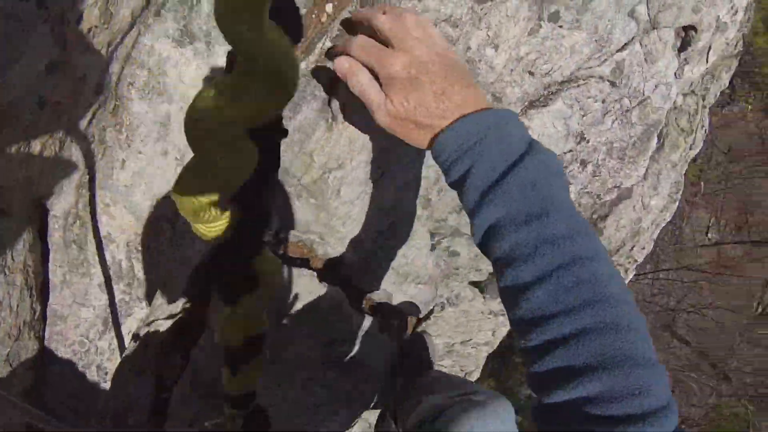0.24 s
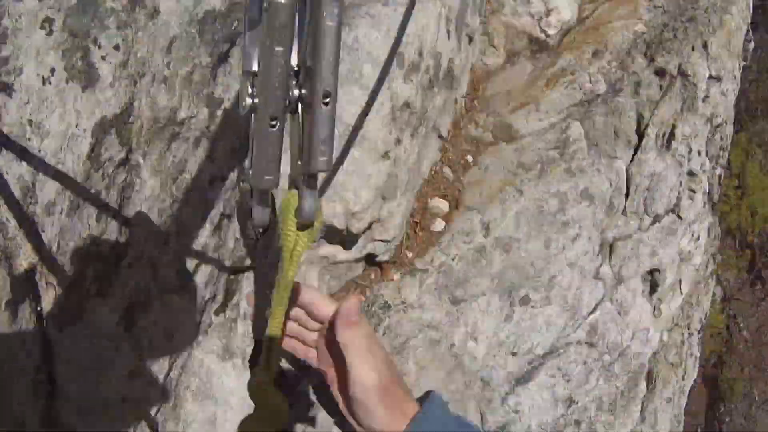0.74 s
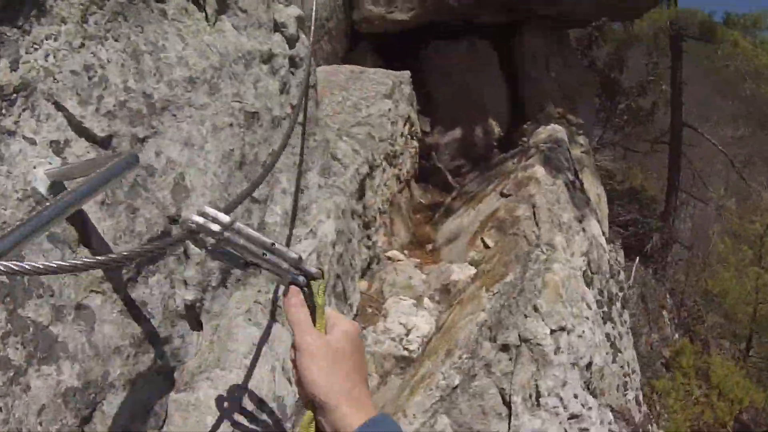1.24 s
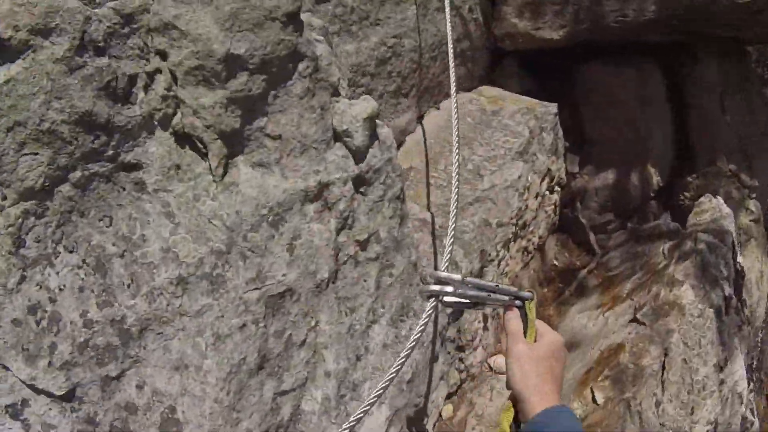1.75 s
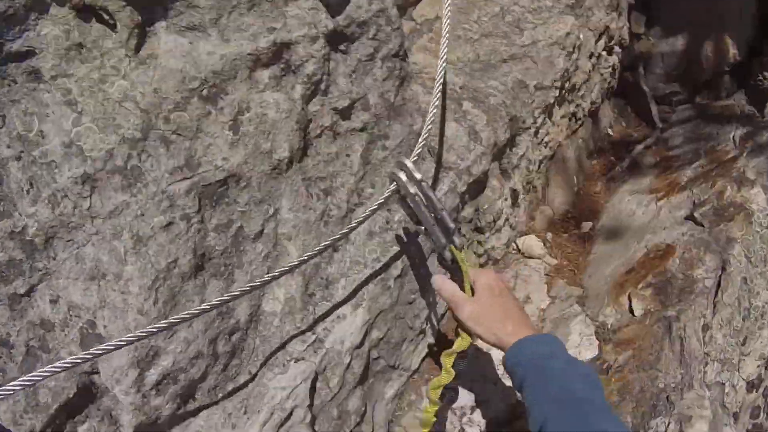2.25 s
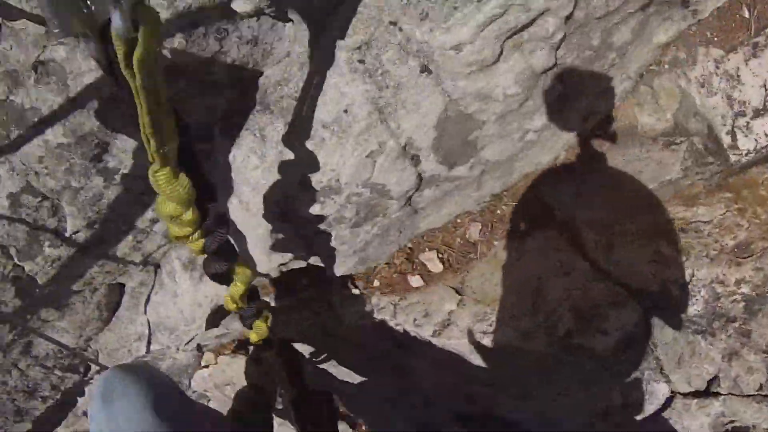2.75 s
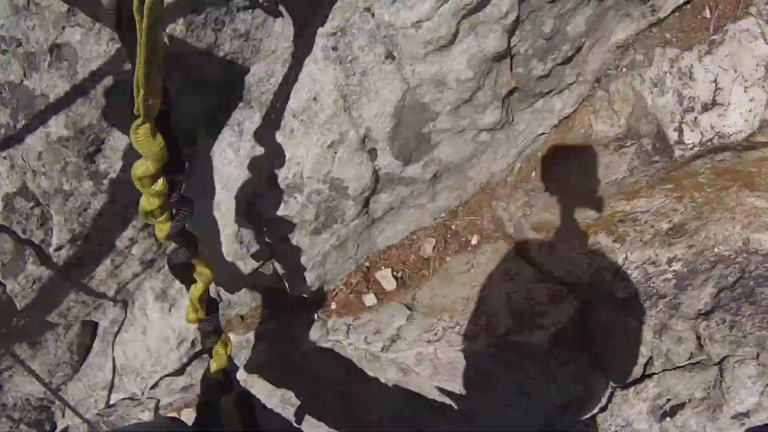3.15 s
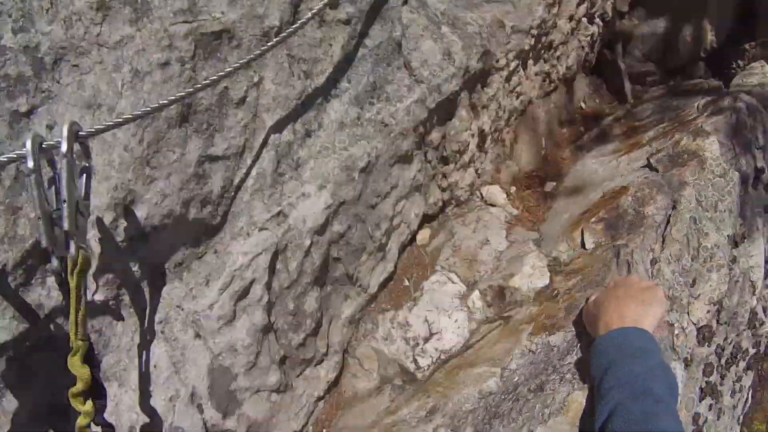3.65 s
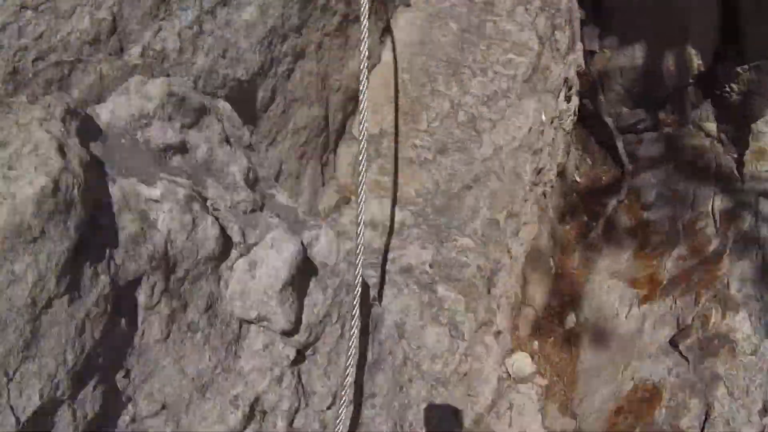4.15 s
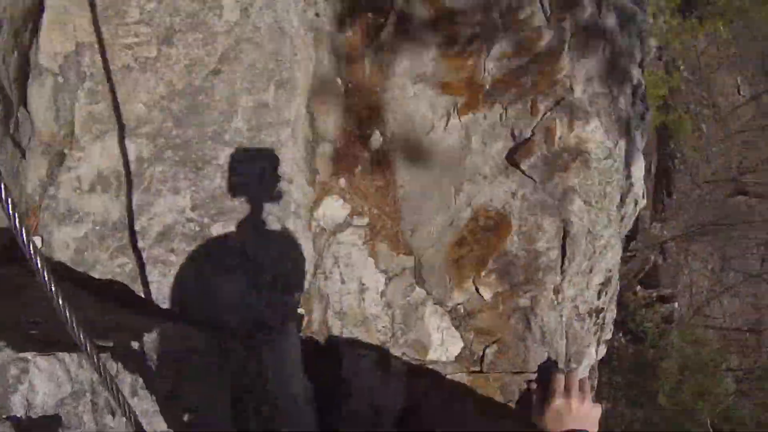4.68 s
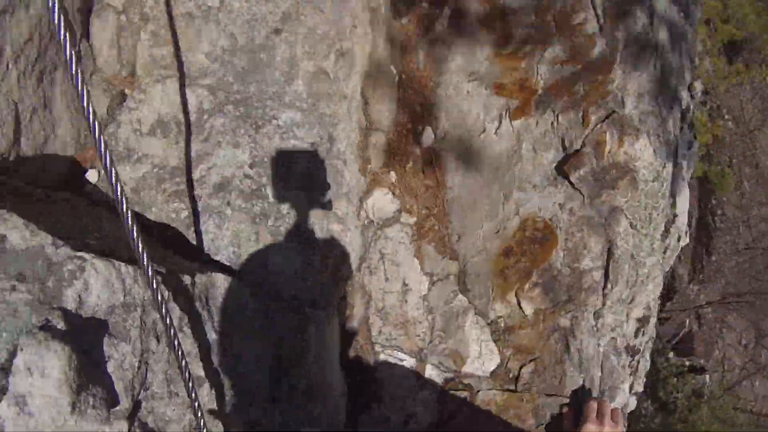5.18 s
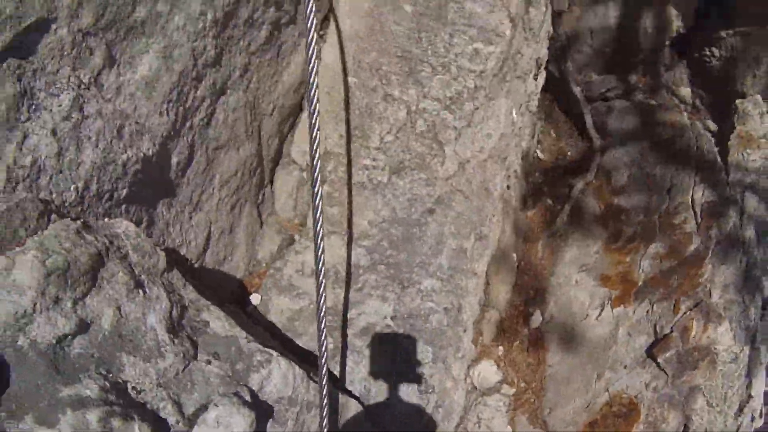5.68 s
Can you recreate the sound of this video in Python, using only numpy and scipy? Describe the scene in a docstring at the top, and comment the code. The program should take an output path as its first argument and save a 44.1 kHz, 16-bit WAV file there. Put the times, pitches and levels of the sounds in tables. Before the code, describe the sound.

A dry, close, muffled perspective from inside a helmet-mounted camera housing, with unsteady deep rumble, soft strap rustle and faint air noise throughout. At 0 s a hard rattling knock, strap scuff and short steel ring come together, then only weak bumps and, from 0.6 s, tiny carabiner clicks. From 0.9 to 1.3 s heavy low jolts and dull knocks pile up. Thin, bright scratching of carabiners on cable strands follows until about 2 s, interrupted by strong thumps at 2.1-2.2 s and lighter knocks to 2.45 s; sharper scrapes and clicks reach 2.7 s. A quieter gap follows, with a clear high metallic ring at 3.35 s. From 3.65 s a strap drags gritty with a faint falling creak, into the loudest thuds at 3.8-4.1 s. A thump at 4.5 s and hollow knocks with short rings at 4.9, 5.15, 5.35 and 5.6 s end it over rumble.

```python
"""A climber moves two carabiners along a steel cable, heard inside a closed housing on the helmet.
Strap scuff, knocks and a ringing rung at once; weak jolts from 0.16 s, strong ones from 0.9 s; strands scratch
the carabiners at 1.2-2.7 s, more blows fall near 2.2 s; a clear ring at 3.4 s, then a strap drags and creaks
into heavy jolts at 3.8-4.1 s; knocks and rings to the end. Rumble, boom, rustle and air noise lie under all.
Noise bursts and clicks drive resonant modes; jolts and rings are decaying sines."""
import sys
import numpy as np
from scipy import signal
from scipy.fft import rfft, irfft
from scipy.io import wavfile

SR = 44100
rng = np.random.default_rng(int(sys.argv[2]) if len(sys.argv) > 2 else 0)


def pcm_store(signal):
    """Save signal as 16-bit PCM."""
    levels = np.round(np.clip(np.atleast_2d(signal), -1, 1) * 32767)
    wavfile.write(sys.argv[1], SR, levels.astype(np.int16).T)


N = 261072

# air noise spectrum: (frequency [Hz], relative density [dB per Hz])
AIR = [(200, -1), (500, -11), (1000, -10), (2000, -12), (4000, -17.5), (8000, -24), (12000, -33.5),
       (15000, -54)]
# hiss opposite in the two channels: (frequency [Hz], relative density [dB per Hz])
SIDE_HISS = [(700, -31), (1500, -5.5), (2500, 0.5), (5000, -1), (9000, -6), (12000, -15), (15000, -40)]
# body movement through the mount: (time [s], mean deep rumble [dB], mean strap rustle [dB])
MOVE = [(0.0, -25, -52), (0.08, -28, -62), (0.4, -28, -62), (0.58, -31, -65), (0.69, -20, -52),
        (0.81, -31, -60), (1.04, -33, -54), (1.12, -25, -45), (1.4, -21, -57), (1.65, -18, -55),
        (1.73, -27, -62), (1.85, -31, -64), (1.96, -30, -59), (2.01, -29, -50), (2.07, -26, -60),
        (2.2, -20, -64), (2.37, -30, -59), (2.47, -27, -60), (2.57, -23, -56), (2.85, -29.5, -66),
        (3.4, -32, -63), (3.7, -22, -56), (3.9, -15, -39), (4.06, -29, -68), (4.28, -22, -53),
        (4.4, -26, -61), (4.52, -21, -50), (4.75, -24, -59), (4.96, -28, -63), (5.09, -21, -56),
        (5.2, -24, -52), (5.35, -27, -61), (5.6, -30, -62), (5.92, -20, -51)]
# strap rustle spectrum: (frequency [Hz], relative density [dB per Hz])
RUSTLE = [(250, 1), (400, 3.5), (700, -12), (950, 0), (1300, -12), (2200, -14.5), (3500, -19),
          (6000, -27.5)]
# housing modes: (frequency [Hz], width [Hz], relative level [dB])
HOUSING = [(667, 233, 1), (905, 143, -2), (1380, 242, 3), (1637, 250, 1), (2160, 157, -2),
           (2657, 460, -3.5), (3134, 185, -9)]
# treble modes of the housing: (frequency [Hz], width [Hz], relative level [dB])
HOUSING_TREBLE = [(3660, 1000, 9), (4840, 1200, 15), (5370, 1200, 13.5), (7300, 2700, 3), (9800, 2500, -9)]
# low modes shaken by every blow: (frequency [Hz], width [Hz], level re body for a 1 kHz blow [dB])
THUD = [(172, 45, -25), (440, 220, -19)]
# strap drags on the housing: (start [s], loudest [s], end [s], relative level at each of the three [dB] x3)
SCUFFS = [(0.0, 0.01, 0.022, -42, -42, -32), (3.62, 3.8, 4.02, -77, -43, -53),
          (4.85, 4.88, 4.905, -66, -48, -44)]
# jolts: (time [s], peak before ducking [dB], pitch [Hz], swings to fall 60 dB [count], push +1 / pull -1)
JOLTS = [(.16,-30,170,9.5,1),(.26,-32,170,7.5,-1),(0.527,-30.5,153,3.5,1),(.905,-15.5,62,2.1,-1),(.942,-5,61,4.9,1),(.961,-16.5,153,14.5,1),(1.062,-5,94,1.3,1),(1.07,0.5,127.6,10.8,-1),(1.092,-1.5,62,5.6,1),(1.113,-17,140,9.5,1),(1.145,-1,130,8.1,-1),(1.193,-8,157,15,1),(1.231,-5,53.6,4.6,-1),(1.288,-11,43,5.6,-1),(1.417,-14,57,3.1,1),(1.563,-24,150,9.3,1),(1.633,-24,165,8.1,1),(2.123,-16.5,165,30,1),(2.167,2.5,94,4.6,1),(2.192,-3.5,130,9.5,-1),(2.205,1,70.5,6.4,-1),(2.606,-20,43.4,6.9,1),(2.771,-21.5,40,3.7,1),(3.585,-25,165,12,1),(3.834,4.5,62,3.1,1),(3.894,4,156,9.4,-1),(3.968,-10.5,134.5,43,-1),(4.034,-4.5,59.6,1.3,1),(4.046,4,161.5,9.4,1),(4.053,8,83.6,3.3,-1),(4.16,-26,170,9.5,1),(4.283,-13.5,61,2.9,-1),(4.516,-18,90,2,-1),(4.522,-3.5,160,9,1),(4.523,-12,380,4,1),(4.545,-24,140,5,1)]
# modes of the steel rung: (frequency [Hz], relative level [dB], usual time to fall 60 dB [s])
RUNG = [(710, -10, .3), (1034, -10, .37), (1448, 0, .42), (1534, -2, .62), (2441, -24, .55), (2826, -9, .4),
        (3052, -8, .28), (3693, -22, .55), (3951, -5, .16), (4705, -17, .15), (4813, -16, .12),
        (5420, -4, .09), (5700, -17, .14)]
# blows on the rung: (time [s], level [dB], favoured pitch [Hz], fall-off from it [dB/octave],
# ring time [share of usual])
RINGS = [(.026,-32.5,1700,3.5,.9),(1.312,-47.5,1450,12,.6),(2.277,-39,710,18,1.1),(2.344,-50,1450,14,.9),(2.437,-59,1900,12,.9),
         (3.353,-27,2435,140,1.1),(3.36,-58,1500,4,.9),(3.896,-37.5,3820,5,.9),(4.046,-46,1450,4.5,.9),(4.092,-45,1440,80,4.5),(4.29,-50,1540,40,.4),
         (4.918,-44,1400,12,1.1),(4.925,-42,3052,90,.9),(5.142,-41,1550,8,1.3),(5.143,-34,3052,40,.6),(5.144,-36,3690,90,1.1),(5.347,-47,1440,9,1.1),(5.349,-40,2441,90,.7),(5.35,-52,3850,50,1.1),(5.574,-56.5,3900,20,.7)]
# carabiner modes: (frequency [Hz], nominal width [Hz], relative level in strokes [dB])
CARABINER = [(2850, 60, -9), (3730, 80, -13), (4310, 90, -1), (4760, 130, -5), (5280, 70, -4),
             (5410, 70, -1), (5650, 60, -8), (5850, 130, -2), (6010, 150, -4), (6850, 90, -14),
             (7100, 150, -14), (7340, 70, -11), (8050, 200, -14), (8920, 90, -8), (10500, 70, -23),
             (11500, 110, -25)]
# strokes along the cable: (start [s], loudest [s], end [s], relative level at each of the three [dB] x3,
# favoured pitch [Hz])
SLIDES = [(1.17, 1.33, 1.6, -67, -56.5, -66, 5700), (1.6, 1.65, 1.82, -67, -64, -68, 5400),
          (1.9, 2.008, 2.04, -76, -65, -72, 4300), (2.37, 2.44, 2.5, -68, -54, -58, 7500),
          (2.5, 2.58, 2.6, -58, -50.5, -55, 6400), (2.6, 2.67, 2.71, -56, -48, -56, 4800)]
# carabiners touching: (time [s], click level [dB], loudest pitch [Hz], held in contact 1 / hanging free 0)
TICKS = [(0.608,-60,5300,0),(.668,-61,6900,0),(0.687,-53,4900,0),(0.842,-48,5260,0),
         (1.169,-49,5900,1),(1.18,-44,6850,1),(1.182,-52,4300,1),(1.706,-58,7900,1),(1.735,-59,7900,1),(1.8,-58,7700,1),(1.803,-67,7340,0),(1.93,-54,3800,0),(2.0,-51,3820,0),
         (2.575,-47,5280,0),(2.675,-45,4310,1),(2.676,-54,5260,0),(2.702,-52,7340,0),(2.705,-44,4900,0)]
# knocks: (time [s], body peak before ducking [dB], favoured pitch [Hz], treble peak re body [dB])
KNOCKS = [(0.024, -4.5, 2160, -10.5), (0.037, -11.5, 1300, -28), (0.049, -19, 950, -35),
          (0.91, -32.5, 600, -15), (0.943, -28, 708, -11), (1.06, -7, 619, -29.5), (1.073, -14, 1200, -25),
          (1.093, -22.5, 628, -32.5), (1.144, -25, 818, -11), (1.199, -26, 649, -33),
          (1.231, -34.5, 1650, -21), (1.285, -36, 700, -30), (1.309, -19, 1640, -26),
          (1.563, -37, 950, -26), (1.644, -34, 630, -27), (1.678, -52, 1400, 0), (2.124, -21, 608, -43),
          (2.166, -19, 650, -16.5), (2.191, -24.5, 600, -38), (2.204, -14, 1350, -20),
          (2.228, -30, 704, -40.5), (2.274, -23.5, 1480, -43), (2.345, -33, 910, -38.5),
          (2.356, -30.5, 880, -31), (2.435, -16.5, 2030, -17), (2.446, -29, 780, -22),
          (2.47, -62, 2100, 15), (2.63, -60, 2100, 16), (2.672, -56, 2100, 22), (3.152, -40, 1065, -26),
          (3.22, -40, 700, -30), (3.232, -29, 1380, -22), (3.352, -17, 2150, -40), (3.357, -21, 900, -40),
          (3.814, -23.5, 786, -29), (3.833, -15, 684, -21.5), (3.887, -16, 670, -32),
          (3.893, -5, 1900, -19.5), (3.903, -22, 1090, -5.5), (3.981, -27.5, 724, -24),
          (4.036, -28, 605, -13), (4.046, -2.5, 594, -25), (4.056, -26, 704, -32), (4.087, -30, 1470, -35),
          (4.159, -38.5, 950, -34), (4.351, -20, 1710, -21), (4.455, -41, 950, -27),
          (4.489, -39, 900, -25.5), (4.521, -12, 600, -35), (4.548, -38, 1500, -12),
          (4.634, -20.5, 1450, -42), (4.73, -39.5, 630, -12.5), (4.895, -27, 2160, -35),
          (4.91, -30, 900, -40), (4.917, -9.5, 1380, -35), (4.924, -14, 2160, -40), (5.069, -37, 950, -32),
          (5.116, -36, 1400, -37), (5.128, -15, 1100, -33), (5.14, -5, 2160, -17),
          (5.177, -11.5, 1000, -30), (5.186, -29, 940, -41), (5.226, -23, 2160, -30),
          (5.235, -23.5, 1480, -37), (5.347, -15, 1420, -32), (5.399, -37, 915, -27),
          (5.572, -19, 1380, -49), (5.614, -35, 1100, -15)]

AIR_DB, SIDE_HISS_DB, CUTOFF_HZ = -62.5, -79, 15700
BOOM_DB, BOOM_DB_PER_DB, USUAL_RUSTLE_DB = -44.5, 1.15, -57   # boom level at the usual rustle
CREAK_S, CREAK_HZ, CREAK_SAG_HZ_PER_S, CREAK_DB = (3.725, 3.78, 3.89), 500, 780, -44.5   # start, peak, end
STROKE_FADE_S = 0.018   # time constant after a stroke or drag ends
BOUNCE_S, DAMPING_S = 0.03, 0.04   # blows within a bounce ring together; time constant of stilling
SLIDE_FOCUS_DB_PER_OCTAVE, TICK_FOCUS_DB_PER_OCTAVE = 16.0, 60
FREE_DAMPING, HELD_DAMPING, STROKE_DAMPING = 0.35, 2.2, 0.8   # share of the nominal carabiner widths
TAPS_PER_S, TAP_MAX_DB = 5, -48
RATTLE_S, RATTLE_S_PER_DB = 0.028, 0.00022   # rattle length at 0 dB, shorter for weaker blows
KNOCK_FOCUS_DB_PER_OCTAVE, THUD_DB_PER_OCTAVE, BODY_CUT_HZ = 8.8, 6.0, 5500


def from_db(db):
    """Decibels to gain."""
    return 10 ** (np.asarray(db, float) / 20)


def rms_one(x):
    """Scale to rms 1."""
    return x / np.sqrt(np.mean(x ** 2) + 1e-20)


def curve(rows, column):
    """One table column interpolated over the first, sample by sample."""
    rows = np.array(rows, float)
    return np.interp(np.arange(N) / SR, rows[:, 0], rows[:, column])


def drift(rate_hz):
    """Slow noise of rms about 1: two equal low-pass poles at rate_hz, run at SR / 40."""
    r = np.exp(-80 * np.pi * rate_hz / SR)
    white = rng.standard_normal(N // 40 + 2002)
    slow = signal.lfilter([1], [1, -2 * r, r * r], white)[2000:]
    return np.interp(np.arange(N) / 40, np.arange(len(slow)), rms_one(slow))


def coloured(x, spectrum):
    """Shape by a spectrum, 12 dB/octave roll-off added below its first point; rms 1."""
    hz, db = np.transpose(spectrum)
    f = np.maximum(np.fft.rfftfreq(N, 1 / SR), 1)
    gain = from_db(np.interp(np.log(f), np.log(hz), db)) * np.minimum(f / hz[0], 1) ** 2
    return rms_one(irfft(rfft(x) * gain, N))


def resonance(x, hz, width_hz):
    """Two-pole resonance; a unit click rings as a decaying sine of starting amplitude about 1."""
    r, w = np.exp(-np.pi * width_hz / SR), 2 * np.pi * hz / SR
    return signal.lfilter([0, np.sin(w)], [1, -2 * r * np.cos(w), r * r], x + 1e-18)


def lowpass(x, order, hz):
    """Butterworth low-pass."""
    return signal.sosfilt(signal.butter(order, hz, fs=SR, output="sos"), x)


def add(out, s, sound):
    """Mix a short sound in at a time."""
    i = round(s * SR)
    out[i:i + len(sound)] += sound[:N - i]


def grains(per_s, spread_db):
    """Random clicks of uneven size and sign."""
    sizes = from_db(spread_db * np.minimum(rng.exponential(1, N), 5)) * rng.choice([-1, 1], N)
    return sizes * (rng.random(N) < per_s / SR)


def gated(strokes):
    """Sum of stroke gains, each through its three levels, then fading exponentially."""
    t = np.arange(N) / SR
    total = 0
    for row in strokes:
        fade = np.exp(-np.maximum(t - row[2], 0) / STROKE_FADE_S)
        total = total + from_db(np.interp(t, row[:3], row[3:])) * (t >= row[0]) * fade
    return total


def air():
    """Broadband noise with a slightly wavering level."""
    level_db = AIR_DB + 1.0 * drift(14)
    return from_db(level_db) * coloured(rng.standard_normal(N), AIR)


def movement():
    """Sway as low-passed noise; chafing grit rustles through housing modes and its level drives a boom."""
    white = rng.standard_normal((2, N))
    deep = signal.sosfilt(signal.butter(2, [18, 45], "band", fs=SR, output="sos"), white[0])
    deep = lowpass(deep, 1, 50)
    bumpy = white[1] + 0.9 * rms_one(grains(70, 3.0))
    boom = rms_one(resonance(resonance(bumpy, 174, 40), 170.7, 45))
    boom = boom + 0.35 * rms_one(resonance(bumpy, 95, 80))
    grit = grains(1500 * from_db(4.4 * drift(30)), 1.8)
    modes = sum((-1) ** m * from_db(g) * rms_one(resonance(grit, hz, w))
                for m, (hz, w, g) in enumerate(HOUSING))
    rustle = coloured(grit + 1.22 * rms_one(modes) * grit.std(), RUSTLE)

    chafe_db = curve(MOVE, 2)
    deep_db = curve(MOVE, 1) + 1.5 * drift(4)
    boom_db = BOOM_DB + BOOM_DB_PER_DB * (chafe_db - USUAL_RUSTLE_DB) + 4.3 * drift(18)
    rustle_db = chafe_db + 3.0 * drift(20)
    return from_db(deep_db) * rms_one(deep) + from_db(boom_db) * rms_one(boom) + from_db(rustle_db) * rustle


def strap_scuffs():
    """A strap drags over the housing: dense gritty slips ring low and high resonances."""
    grit = grains(900 * from_db(4.0 * drift(40)), 2.5)
    low = rms_one(resonance(grit, 930, 90)) + 0.6 * rms_one(resonance(grit, 1400, 900))
    high = rms_one(resonance(grit, 2250, 180))
    return gated(SCUFFS) * from_db(3.0 * drift(25)) * rms_one(low - .5 * high)


def strap_creak():
    """The tightening strap creaks: a sine of falling pitch and its octave."""
    t = np.arange(N) / SR
    since = t - CREAK_S[0]
    phase = 2 * np.pi * (CREAK_HZ * since - CREAK_SAG_HZ_PER_S * since ** 2 / 2)
    creak = (np.sin(phase) + 1.3 * np.sin(2 * phase)) * np.interp(t, CREAK_S, [0, 1, .6], right=0)
    return from_db(CREAK_DB + 2.5 * drift(30)) * creak


def jolts():
    """Each jolt pushes or pulls the housing, which swings as a decaying sine."""
    out, t = np.zeros(N), np.arange(SR // 4) / SR
    for s, db, hz, swings, direction in JOLTS:
        decay = from_db(-60 * t * hz / max(swings, .5))
        onset = 1 - np.exp(-t * hz / 0.087)
        swing = np.sin(2 * np.pi * hz * t) * decay * onset
        add(out, s, np.sign(direction) * from_db(db) * swing / np.abs(swing).max())
    return out


def rung():
    """Struck steel rings decaying sines, uneven by chance; the next contact after a bounce stills them."""
    strengths_db = rng.normal(0, 1.9, (len(RINGS), len(RUNG)))
    out, t = np.zeros(N), np.arange(SR * 3 // 5) / SR
    hz, g, t60_s = np.transpose(RUNG)[:, :, None]
    for k, (s, db, pitch_hz, fall_db, share) in enumerate(RINGS):
        until = min([later[0] - s for later in RINGS if later[0] > s + BOUNCE_S], default=t[-1])
        start_db = db + g - fall_db * np.abs(np.log2(hz / pitch_hz)) + strengths_db[k][:, None]
        level_db = start_db - 60 * t / (t60_s * max(share, .1))
        ring = (from_db(level_db) * np.sin(2 * np.pi * hz * t)).sum(axis=0)
        add(out, s, ring * np.exp(-np.maximum(t - until, 0) / DAMPING_S))
    return out


def cable_strokes():
    """Cable strands scratch the carabiners: random slips ring the modes near each stroke's pitch, plus hiss."""
    scratch = rms_one(grains(2600 * from_db(4.0 * drift(30)), 3.4))
    dealt = rng.integers(0, 3, N)   # each slip reaches a third of the modes
    strokes = [gated([row[:6]]) for row in SLIDES]
    out = np.zeros(N)
    for m, (hz, w, g) in enumerate(CARABINER):
        reach = sum(stroke * from_db(-SLIDE_FOCUS_DB_PER_OCTAVE * abs(np.log2(hz / row[6])))
                    for stroke, row in zip(strokes, SLIDES))
        swell = from_db(g + 3.5 * drift(12))   # wandering contact point: modes swell separately
        slips = reach * scratch * (dealt == m % 3)
        out += 0.016 * swell * np.sqrt(w) * resonance(slips, hz, w * STROKE_DAMPING)
    hiss_spectrum = [(2500, -2), (5500, 5.5), (8500, -5), (12000, -5), (16000, -44)]   # (Hz, dB)
    hiss = coloured(scratch + 0.3 * rng.standard_normal(N), hiss_spectrum)
    return out + 0.33 * sum(strokes) * hiss


def carabiner_touches():
    """Single clicks ring the modes near their pitch, damped more when held in contact."""
    at = [round(row[0] * SR) for row in TICKS]
    db, pitch_hz, held = np.array(TICKS)[:, 1:].T
    out = np.zeros(N)
    for hz, w, _ in CARABINER:
        for damping, chosen in [(FREE_DAMPING, held < .5), (HELD_DAMPING, held >= .5)]:
            clicks = np.zeros(N)
            focus_db = -TICK_FOCUS_DB_PER_OCTAVE * np.abs(np.log2(hz / pitch_hz))
            clicks[at] = from_db(db + focus_db) * chosen
            out += resonance(clicks, hz, w * damping)
    return out


def buckle_taps():
    """Faint buckle taps at random times, as rows like KNOCKS."""
    chance = rng.random((60, 3))
    times = np.cumsum(-np.log(1 - chance[:, 0])) / TAPS_PER_S
    return [(s, TAP_MAX_DB - 10 * a, 650 * 2 ** b, -28)
            for s, (a, b) in zip(times, chance[:, 1:]) if s < N / SR]


def knocks():
    """Blows and taps: a short noise rattle excites housing body modes, treble modes and a low thud."""
    out, t = np.zeros(N), np.arange(SR // 8) / SR
    noise = rng.standard_normal((len(KNOCKS) + 60, len(t)))
    for k, (s, db, pitch_hz, treble_db) in enumerate(KNOCKS + buckle_taps()):
        length_s = max(RATTLE_S + RATTLE_S_PER_DB * db, .004)
        # builds up, holds, stops short
        blow = noise[k] * from_db(-60 * (t / length_s) ** 1.45) * (1 - np.exp(-t / 0.00069))
        body = 0
        for m, (hz, w, g) in enumerate(HOUSING):
            mode_db = g - KNOCK_FOCUS_DB_PER_OCTAVE * abs(np.log2(hz / pitch_hz))
            body = body + (-1) ** m * from_db(mode_db) * resonance(blow, hz, w)
        body = lowpass(body, 2, BODY_CUT_HZ)   # the housing walls pass little above
        edge = sum((-1) ** m * from_db(g) * resonance(blow * np.exp(-t / .004), hz, w)
                   for m, (hz, w, g) in enumerate(HOUSING_TREBLE))
        thud = 0
        for hz, w, g in THUD:
            low = resonance(blow, hz, w)
            thud_db = g - THUD_DB_PER_OCTAVE * np.log2(pitch_hz / 1000)   # dull blows thud more
            thud = thud + from_db(thud_db) * low / np.abs(low).max()
        treble = from_db(treble_db) * edge / np.abs(edge).max()
        add(out, s, from_db(db) * (thud + body / np.abs(body).max() + treble))
    return out


def scene():
    """One capsule hears everything: both channels alike."""
    mono = air() + movement() + jolts() + knocks() + rung()
    mono = mono + strap_scuffs() + strap_creak() + cable_strokes() + carabiner_touches()
    return np.tile(mono, (2, 1))


def record(dry):
    """Gain ducks after loud peaks, peaks clip, hiss opposes between channels, a low-pass ends the band."""
    level_db = 20 * np.log10(np.abs(dry[0]) + 1e-6)
    ramp_db = 60 * np.arange(N) / SR   # the held peak falls 60 dB per second
    held_db = np.maximum.accumulate(level_db + ramp_db) - ramp_db
    duck_db = -.6 * np.maximum(held_db + 10, 0)   # above -10 dB
    r = np.exp(-1 / (0.0037 * SR))   # 3.7 ms smoothing
    gain = from_db(signal.lfilter([1 - r], [1, -r], duck_db))
    wet = np.clip(dry * gain, -1, 1)
    side = from_db(SIDE_HISS_DB) * coloured(rng.standard_normal(N), SIDE_HISS)
    # faint noisy difference between the channels while ducked
    side += from_db(-30) * (1 - gain) * drift(80) * wet[0]
    band_limit = signal.cheby2(12, 70, CUTOFF_HZ, fs=SR, output="sos")
    return signal.sosfilt(band_limit, wet + side * [[1], [-1]])


dry = scene()
out = record(dry)
pcm_store(out)
```